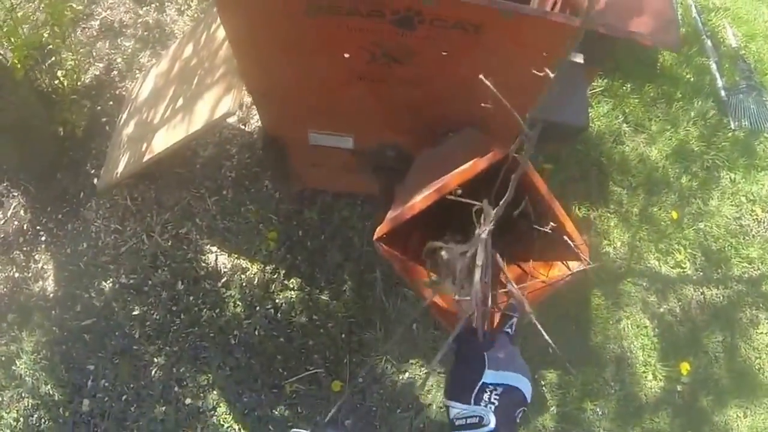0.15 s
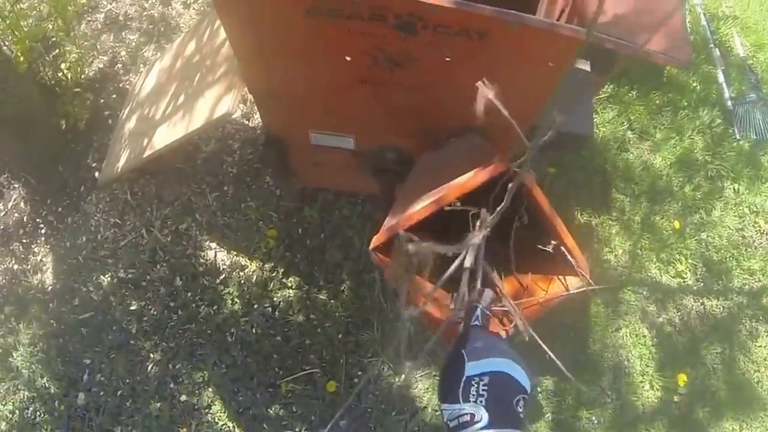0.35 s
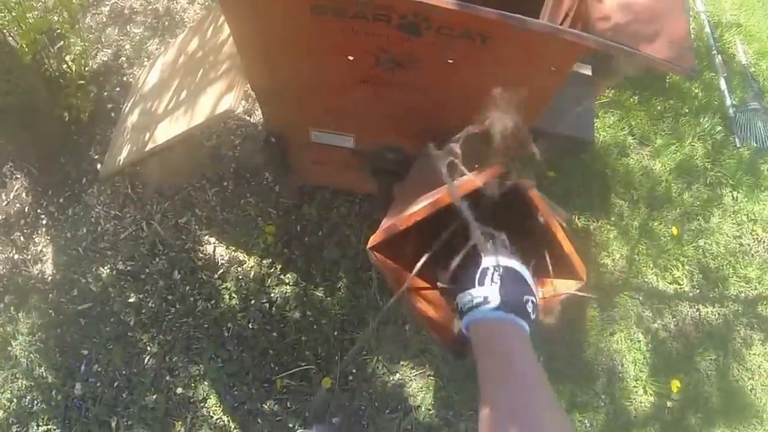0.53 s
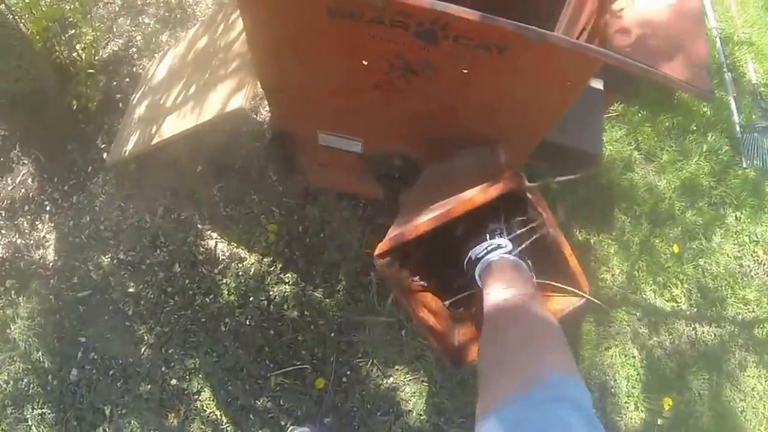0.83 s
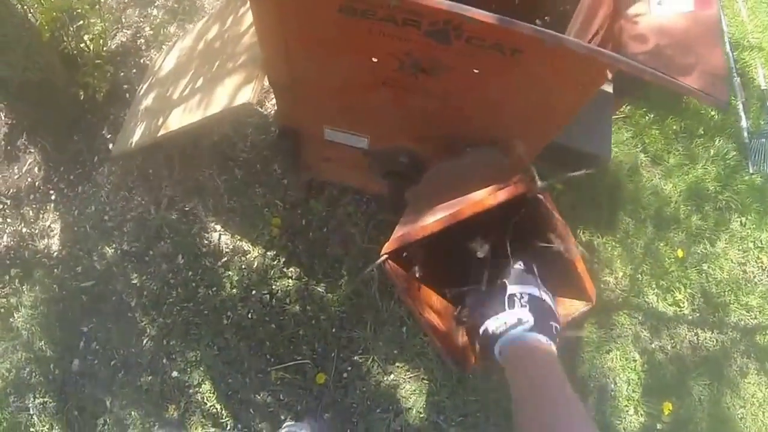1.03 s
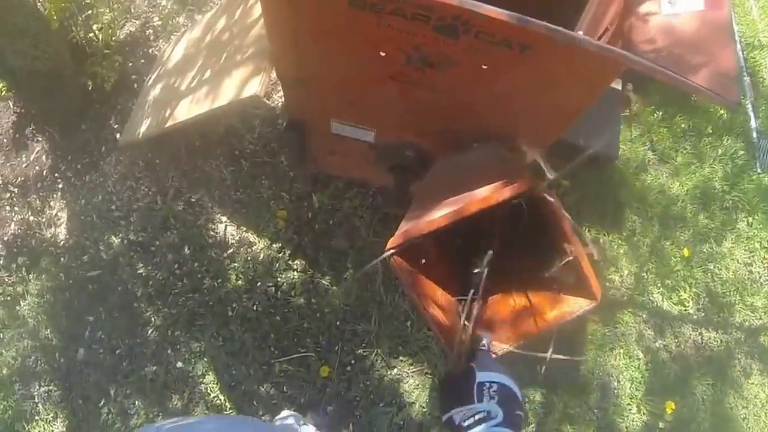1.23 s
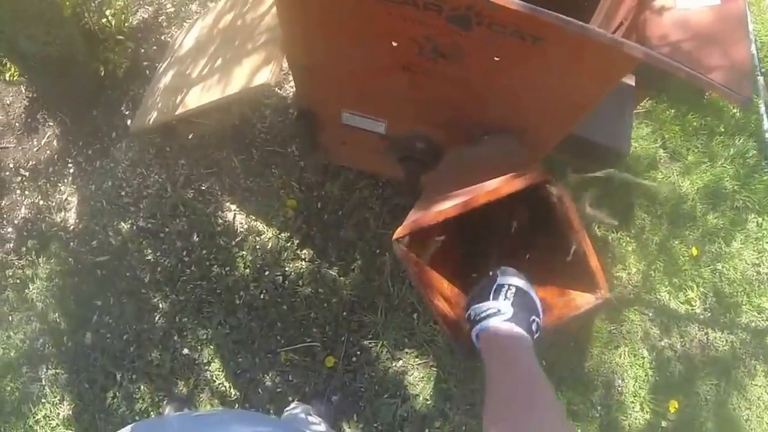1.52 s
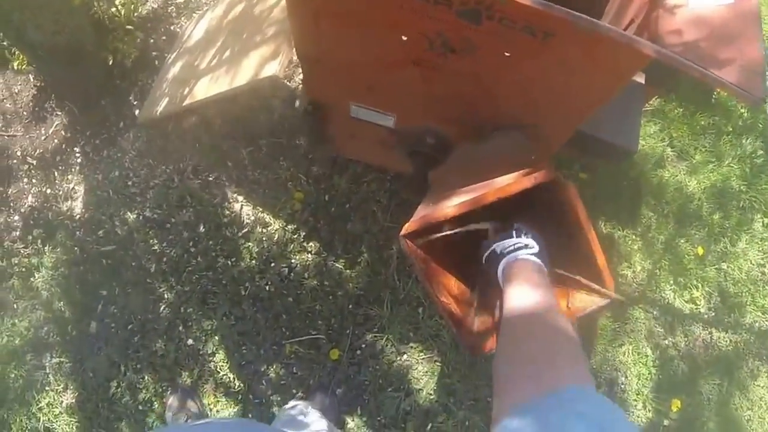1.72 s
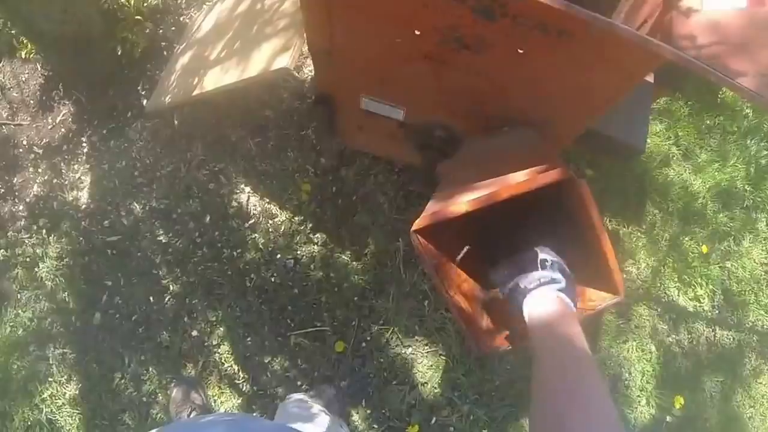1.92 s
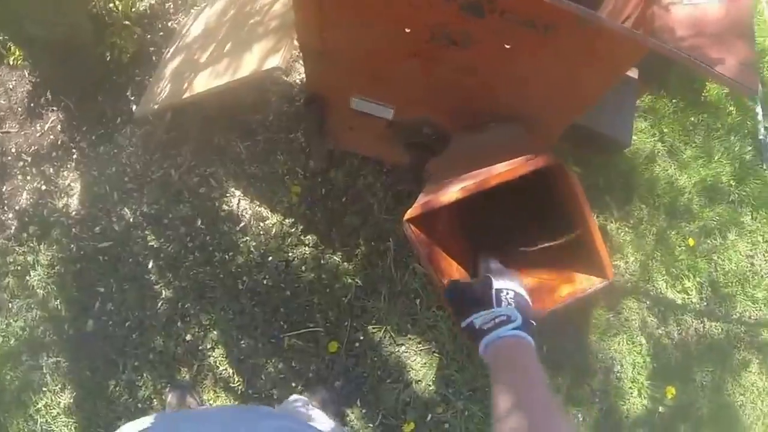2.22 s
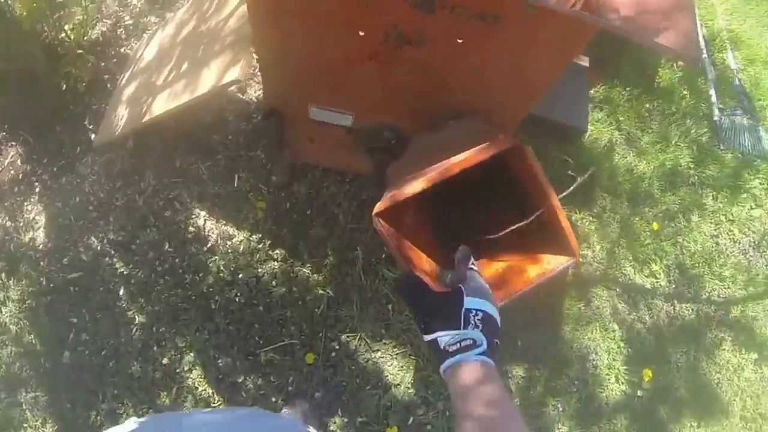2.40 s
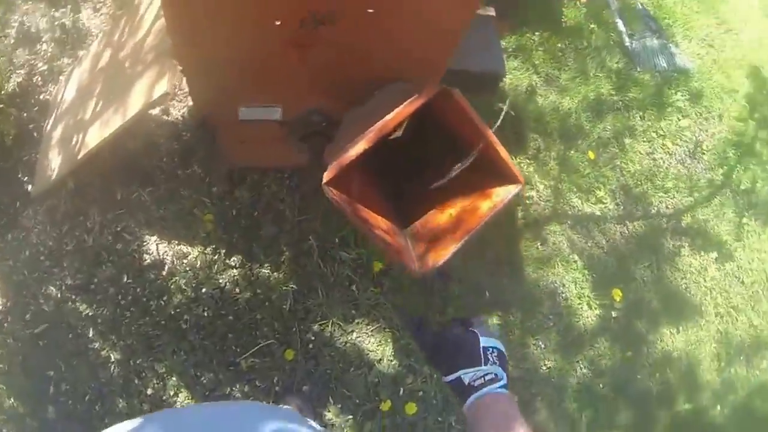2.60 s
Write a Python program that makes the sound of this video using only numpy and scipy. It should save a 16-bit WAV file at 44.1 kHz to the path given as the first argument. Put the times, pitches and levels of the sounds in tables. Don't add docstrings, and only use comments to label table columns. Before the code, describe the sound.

Running wood chipper roars steadily, then chews sticks with harsh rattling crunches and trailing twig ticks

```python
import sys
import numpy as np
from scipy import signal
from scipy.io import wavfile
from scipy.ndimage import uniform_filter1d

SR = 44100
rng = np.random.default_rng(int(sys.argv[2]) if len(sys.argv) > 2 else 0)


def decibels_to_gain(level_db):
    exponent = np.asarray(level_db, float) / 20
    return 10 ** exponent


def transcribe(signal):
    frames = np.atleast_2d(signal).T
    limited = np.clip(frames, -1, 1)
    pcm = np.round(limited * 32767).astype(np.int16)
    wavfile.write(sys.argv[1], SR, pcm)


N = 121275

# (time [s], speed [turns/s])
ROTOR_SPEED = [(0, 35.0), (.38, 35.12), (.5, 34.8), (.65, 34.5), (.85, 33.85), (1.05, 34.1), (1.25, 34.4),
               (1.55, 34.72), (1.75, 34.22), (2.05, 34.22), (2.35, 34.5), (2.5, 34.73), (2.75, 34.95)]
# (time [s], cutting load [dB], twig crackle above it [dB], thick-wood hum above it [dB])
FEED = [(0, -31, 8, -5), (.44, -31.5, 16, -3), (.47, -21.5, 4, -14), (.52, -16.5, 8, 5.5),
        (.58, -16.5, 8, 3.5), (.81, -15.5, 1.5, 3), (.9, -24, 2, 3.5), (.98, -28, 7, 0.5),
        (1.16, -25.5, 7.5, -0.5), (1.31, -23, 4.5, 1.5), (1.37, -24.5, -0.5, -5), (1.5, -25.5, 4.5, -3),
        (1.57, -21.5, 10, 3), (1.74, -13.5, 4, 2.5), (1.9, -18.5, 0.5, 4), (2.02, -20.5, 2.5, 2.5),
        (2.09, -15.5, 1, 5), (2.37, -31.5, -1, -11.5)]
# (time [s], level [dB])
FLAIL_FADE = [
    (0, 5),
    (.4, 4),
    (.9, 1),
    (1.5, 4),
    (2.1, 10),
    (2.26, 4),
    (2.75, -18),
]

# (centre [Hz], half width [Hz], gain [dB])
HOUSING_MODES = [(665, 100, 4), (1340, 138, 19), (1616, 152, 16), (2298, 146, 10), (2750, 260, 11.5),
                 (3178, 65, 7), (3563, 376, 8), (5154, 252, 12), (5522, 250, 9.5), (6220, 400, 8.5),
                 (8380, 390, 3), (9280, 290, 2.5), (11300, 630, 3.5), (311, 4.6, 4.5)]
# (frequency [Hz], density [dB])
ROAR_COLOUR = [(25, 0), (80, -7), (250, 2), (1000, -4), (2000, -9.5), (4500, -16.5), (10000, -24.5),
               (15000, -34)]
CLINK_COLOUR = [(1000, -22), (3000, -7.5), (6000, -1.5), (8500, -2), (11300, -1), (15000, -9)]
SNAP_COLOUR = [(500, 5), (1500, -10), (3000, -4.5), (6000, -6), (11000, -8), (15000, -27)]
CRACK_COLOUR = [(1200, -7.5), (2500, -3.5), (5500, -9), (8000, -28)]
BITE_COLOUR = [(50, -44), (110, -2.5), (300, -1.5), (1000, 0), (2000, 0), (4500, -14), (8000, -17.5),
               (15000, -35.5)]
CRACKLE_COLOUR = [(500, -28.5), (2000, -3), (4500, 0), (8000, -4), (11000, -11), (14500, -16.5)]
TICK_COLOUR = [(1500, -31), (3000, -9), (5500, -7), (7000, -4), (9000, -25), (15000, -38)]
GLINT_COLOUR = [(4000, -34), (7000, -7), (9300, 4.5), (12000, -7), (15000, -14)]

# (multiple of rotor rate, level [dB])
IDLE_ORDERS = [(2, -11), (4, -3), (6, 0), (8, -8), (10, -7), (12, -8), (14, -10), (18, -10), (24, -12),
               (28, -7)]
CUT_ORDERS = [(3, -29), (4, -3), (5, -19), (6, -33), (7, -28), (8, -10.5), (11, -18.5), (12, -33),
              (13, -23.5), (14, -14), (15, -10.5), (16, -18), (17, -36), (18, -9), (19, -11), (20, -16),
              (21, -45), (22, -10), (23, -20), (24, -10.5), (25, -17), (27, -21.5), (29, -25), (30, -13)]
# (multiple of firing rate, level [dB])
ENGINE_ORDERS = [(2, -75), (3, -49.5), (6, -51), (10, -69), (30, -51.5)]
KNIFE_LEVELS = [3, 2, -4, -4.5]

# (time [s], level [dB], decay [s])
SNAPS = [(.388, -24.5, 0.0054), (.402, -28, 0.0045), (.416, -21, 0.0059), (.431, -22, 0.0036),
         (.445, -19, 0.0068), (0.559, -18.5, 0.0094), (1.541, -25, 0.046), (1.935, -23.5, 0.0055),
         (2.006, -31, 0.0059), (2.14, -29, 0.0034), (1.345, -22, 0.0016), (2.145, -17, .004)]
# (time [s], level [dB], decay [s])
CRACKS = [
    (.504, -17, 0.0033),
    (1.935, -18.5, 0.0046),
    (2.216, -19, .004),
    (2.277, -19, .008),
    (2.286, -22, 0.0044),
]
# (time [s], peak level [dB], ring [Hz], length [s])
PANEL_RINGS = [
    (.506, -15, 3500, .0012),
    (.475, -33, 965, .03),
    (.68, -35, 308, .12),
    (.95, -36, 304, .13),
    (1.74, -33, 306, .1),
    (1.95, -36, 305, .08),
    (2.19, -30, 305, .11),
    (.55, -41, 25, .04),
    (1.64, -44, 40, .05),
]
# (time [s], peak level [dB], ring [Hz])
KNOCKS = [(0.518, -8, 1540), (0.528, -10, 1480), (0.537, -8, 1470), (0.548, -9, 1360), (0.579, -12, 1460),
          (0.663, -10, 1490), (0.692, -6, 1420), (0.711, -8, 1380), (0.72, -1.5, 1390), (0.741, -10, 1450),
          (0.748, -9, 1470), (0.77, -23, 1480), (0.78, -2.5, 1420), (0.801, -4, 1400), (0.808, -3, 1450),
          (0.868, -11.5, 1460), (0.897, -17, 1380), (1.307, -9.5, 1520), (1.317, -11, 1480),
          (1.503, -15.5, 1450), (1.597, -6.5, 1400), (1.601, -11, 1470), (1.625, -14, 1430),
          (1.653, -8.5, 1410), (1.683, -14, 1450), (1.704, -10, 1440), (1.711, -8, 1470),
          (1.732, -3.5, 1410), (1.763, -8, 1460), (1.769, -7, 1410), (1.79, -5, 1420), (1.799, -5, 1440),
          (1.827, -2.5, 1460), (1.858, -10, 1440), (1.879, -10, 1440), (1.936, -10, 1460),
          (1.947, -3.5, 1390), (1.965, -4.5, 1410), (1.975, -4, 1410), (2.075, -7.5, 1510),
          (2.092, -7, 1360), (2.105, -8, 1490), (2.114, -14, 1430), (2.218, -5.5, 1430),
          (2.283, -12.5, 1390), (2.288, -12, 1470), (2.492, -17.5, 1390), (2.749, -23, 1430)]
# (time [s], chute ring level [dB], bright level [dB])
TICKS_MID = [(1.004, -19, -46), (1.045, -30, -30.0), (1.061, -18.0, -42), (1.075, -23, -37),
             (1.09, -13.5, -36), (1.12, -25, -37), (1.133, -27, -27), (1.147, -26, -24.0),
             (1.164, -23, -33), (1.178, -20, -28), (1.192, -21, -32), (1.207, -19, -25),
             (1.219, -20.0, -28.0), (1.235, -15, -26), (1.249, -21.0, -25), (1.264, -20.0, -26),
             (1.278, -22, -26), (1.321, -14.5, -25), (1.349, -16, -35), (1.379, -18, -24),
             (1.406, -15, -25), (1.44, -20, -29), (1.468, -27.0, -33.0), (1.498, -22, -32.0)]
TICKS_END = [(2.298, -26, -25), (2.312, -21.5, -25), (2.325, -22, -28.5), (2.341, -23.5, -32.0),
             (2.355, -24, -36.0), (2.37, -28.0, -39), (2.384, -27, -31.0), (2.399, -27, -31),
             (2.412, -27, -30), (2.428, -27.0, -36.0), (2.456, -26.0, -28.5), (2.471, -26, -30.0),
             (2.485, -31.0, -30), (2.5, -26, -44), (2.514, -30.0, -37), (2.529, -25.0, -30),
             (2.543, -28, -34.0), (2.557, -26.0, -33), (2.572, -30, -36), (2.586, -30.0, -32),
             (2.6, -30, -38.0), (2.614, -32.0, -33.0), (2.63, -31, -40.0), (2.643, -30, -36.0),
             (2.657, -25, -30.5), (2.671, -31.0, -40.0), (2.687, -28, -36.0), (2.7, -30, -39.0),
             (2.715, -28, -35.0), (2.729, -34, -30), (2.744, -28, -31)]


def evened(x):
    return x / np.sqrt(np.mean(x ** 2) + 1e-20)


def curve(points, column=1):
    return np.interp(np.arange(N) / SR, [p[0] for p in points], [p[column] for p in points])


def slow(seconds):
    size = max(int(seconds * SR), 2)
    smooth = uniform_filter1d(rng.standard_normal(N), size)
    return evened(uniform_filter1d(smooth, size))


def housed(x, colour):
    hz = abs(np.fft.fftfreq(8192, 1 / SR))
    f, db = np.transpose(colour)
    slope = np.interp(np.log(hz + 1), np.log(f), db)
    modes = sum(gain * np.exp(-((hz - centre) / width) ** 2) for centre, width, gain in HOUSING_MODES)
    log = np.log(decibels_to_gain(slope + modes))
    taps = np.fft.ifft(np.exp(log - 1j * signal.hilbert(log).imag)).real[:4096]
    return signal.oaconvolve(x, taps / np.linalg.norm(taps))[:N]


def puffs(sizes, decay_s):
    decays = signal.lfilter([1], [1, -np.exp(-1 / (decay_s * SR))], sizes)
    r = np.exp(-1 / (.0006 * SR))
    return signal.lfilter([1 - r], [1, -r], decays)


def hum(turns, orders, waver_db):
    total = 0
    for k, db in orders:
        level = decibels_to_gain(db + waver_db * min(k, 8) / 6 * slow(0.024))
        total = total + level * np.sqrt(2) * np.sin(2 * np.pi * (k * turns + rng.random()))
    return total


def passes(turns, spread_db, pattern_db):
    step = np.floor(turns * len(pattern_db)).astype(int)
    knife_db = np.asarray(pattern_db)[step % len(pattern_db)]
    passing = np.diff(step, prepend=step[0]) > 0
    return passing * decibels_to_gain(knife_db + spread_db * rng.standard_normal(N))


def bursts(rows, colour):
    t = np.arange(N) / SR
    envelope = sum(decibels_to_gain(db) * (t > s) * np.exp(-abs(t - s) / decay) for s, db, decay in rows)
    return housed(envelope * rng.standard_normal(N), colour)


def flails(turns):
    strikes = passes(turns + 0.33, 2.0, [0, -4, -3, -4])
    clink = evened(puffs(strikes, .0035) * rng.standard_normal(N))
    return decibels_to_gain(-45.5 + curve(FLAIL_FADE)) * housed(clink, CLINK_COLOUR)


def idle(turns):
    roar = decibels_to_gain(-30 + 1.0 * slow(0.0067)) * housed(rng.standard_normal(N), ROAR_COLOUR)
    whine = hum(np.arange(N) / SR, [(1460, -40.5)], 2.46)
    rotor = decibels_to_gain(-46) * hum(turns, IDLE_ORDERS, 2.2)
    engine = hum(turns * .8735, ENGINE_ORDERS, 2.6)
    return roar + whine + rotor + engine + flails(turns)


def fractures():
    return bursts(SNAPS, SNAP_COLOUR) + bursts(CRACKS, CRACK_COLOUR)


def bites(turns):
    pulses = evened(puffs(passes(turns, 2, KNIFE_LEVELS), 0.0081))
    lumps = decibels_to_gain(1.5 * slow(0.036))
    tearing = decibels_to_gain(-2) * evened(1 + pulses) * lumps * rng.standard_normal(N)
    thuds = decibels_to_gain(-7) * evened(passes(turns, -4.5, [1, -4, -1, -2.5]))
    high_pass = signal.butter(4, 380, "high", fs=SR, output="sos")
    return tearing + signal.sosfilt(high_pass, thuds)


def chip_crackle(turns):
    chips_per_s = 2900
    spray = 1 + evened(puffs(passes(turns, 0.6, [2.5, -1, -3, 8]), 0.0066))
    sizes = decibels_to_gain(2.5 * np.minimum(rng.exponential(1, N), 4))
    chips = puffs((rng.random(N) < chips_per_s / SR) * sizes, 0.0016)
    crackle = evened(chips * spray * rng.standard_normal(N))
    return crackle * decibels_to_gain(-9.5 + curve(FEED, column=2))


def grind(turns):
    untouched_db = -31.5
    load = np.sqrt(np.maximum(decibels_to_gain(2 * curve(FEED)) - decibels_to_gain(2 * untouched_db), 0))
    bite = housed(load * bites(turns), BITE_COLOUR)
    crackle = housed(load * chip_crackle(turns), CRACKLE_COLOUR)
    cut_hum = load * decibels_to_gain(-13 + curve(FEED, column=3)) * hum(turns, CUT_ORDERS, 2.63)
    return bite + crackle + cut_hum


def panel_rings():
    t = np.arange(N) / SR
    return sum(decibels_to_gain(db) * np.exp(-((t - s) / length) ** 2) * np.sin(2 * np.pi * hz * t)
               for s, db, hz, length in PANEL_RINGS)


def knocks():
    t = np.arange(N) / SR
    s, db, hz = np.transpose(KNOCKS)[:, :, None]
    shape = np.exp(-((t - s) / .002) ** 2)
    ring = decibels_to_gain(db) * np.sin(2 * np.pi * hz * t)
    return (shape * ring).sum(axis=0), shape.max(axis=0)


def twigs():
    out = 0
    for column, level_db, colour in ((1, 2.5, TICK_COLOUR), (2, 2, GLINT_COLOUR)):
        hits = np.zeros(N)
        for row in TICKS_MID + TICKS_END:
            hits[round(row[0] * SR)] = decibels_to_gain(row[column] + level_db)
        shape = puffs(hits, 0.00097) + decibels_to_gain(-18.5) * puffs(hits, 0.0031)
        out = out + housed(shape * rng.choice([-1., 1.], N), colour)
    return out


def scene():
    turns = np.cumsum(curve(ROTOR_SPEED)) / SR
    knock, presence = knocks()
    cut = grind(turns + .1) * (1 - .7 * presence) + knock
    return (idle(turns) + fractures() + cut + panel_rings() + twigs())[None]


def roll_off(x):
    return signal.sosfilt(signal.butter(12, 15700, fs=SR, output="sos"), x)


def record(dry):
    overloaded = np.tanh(dry / 2) * 2
    hz, t, z = signal.stft(overloaded, SR, "cosine", nperseg=2048)
    edge_hz, spread_hz, step_hz = 14900, 420, 340
    wander = np.clip(rng.standard_normal(len(t)), -2, 1.5) * spread_hz
    edge = edge_hz + step_hz * np.round(wander / step_hz)
    limited = signal.istft(z * (hz[:, None] < edge), SR, "cosine", nperseg=2048)[1][:, :N]
    return roll_off(limited)


dry = scene()
out = record(dry)
transcribe(out)
```